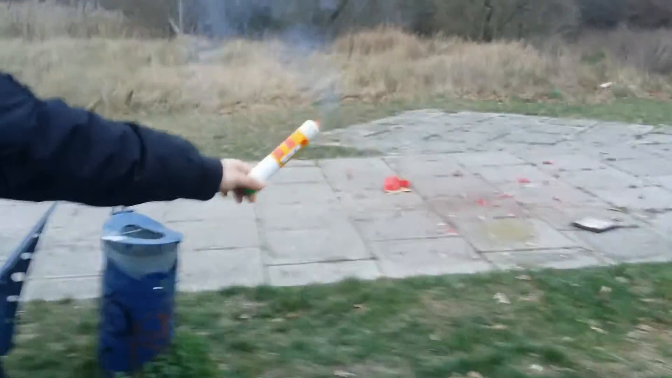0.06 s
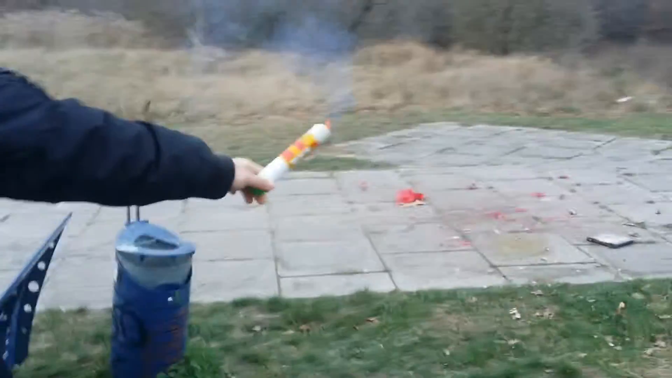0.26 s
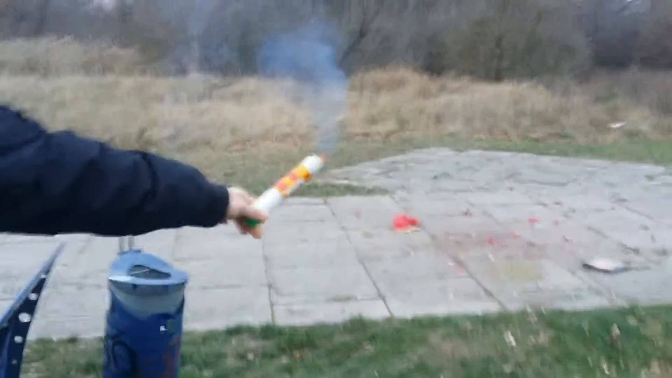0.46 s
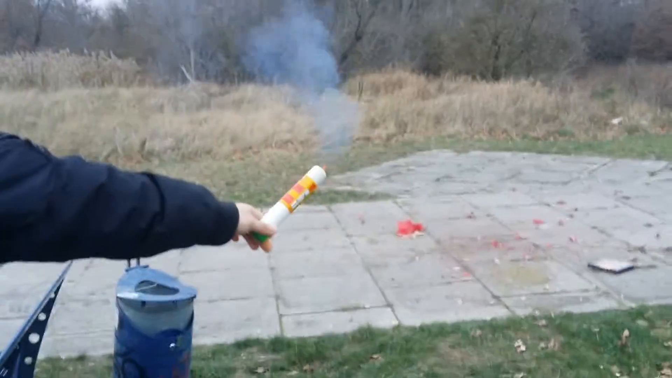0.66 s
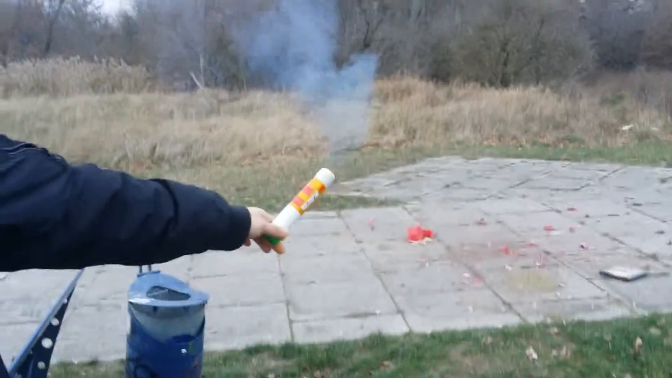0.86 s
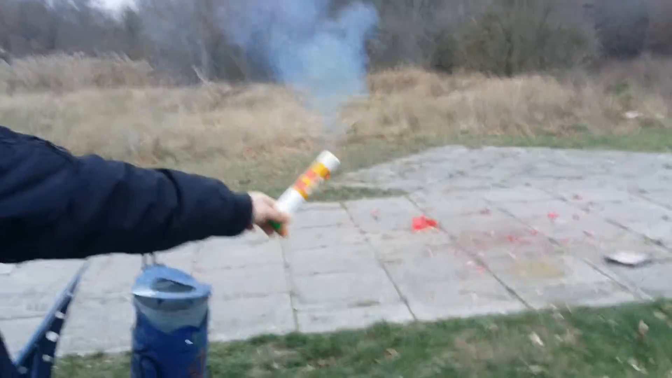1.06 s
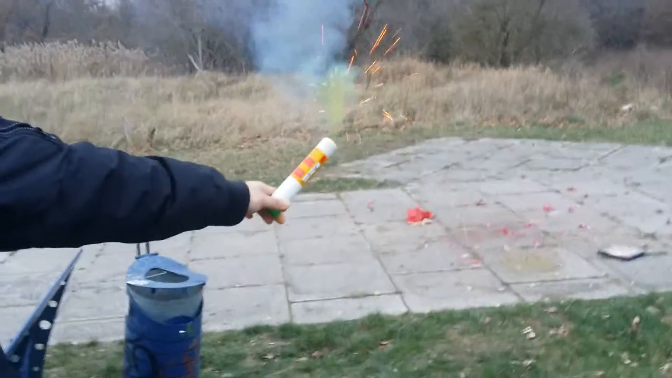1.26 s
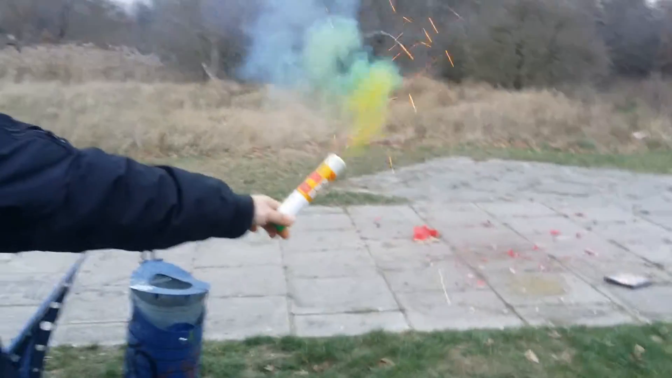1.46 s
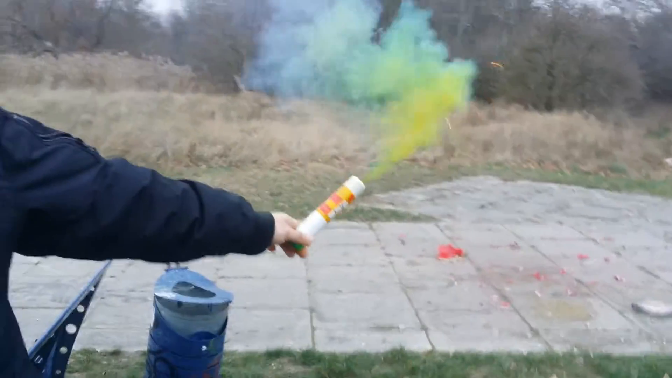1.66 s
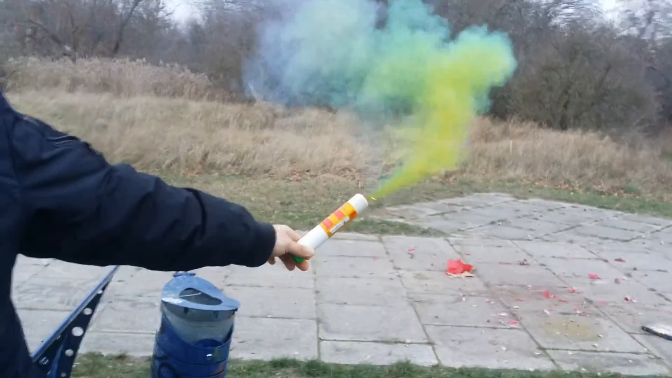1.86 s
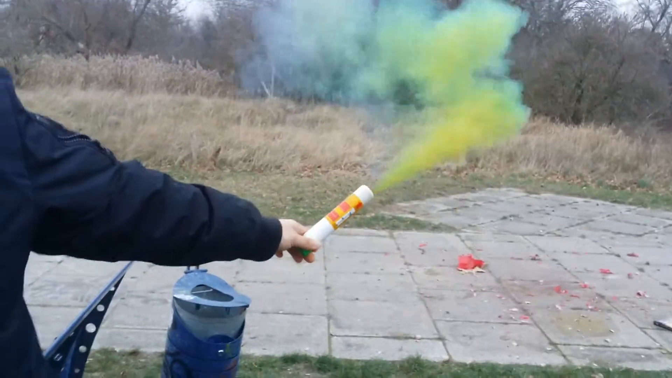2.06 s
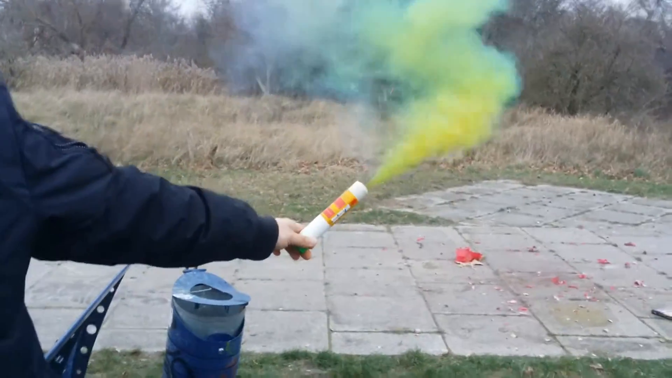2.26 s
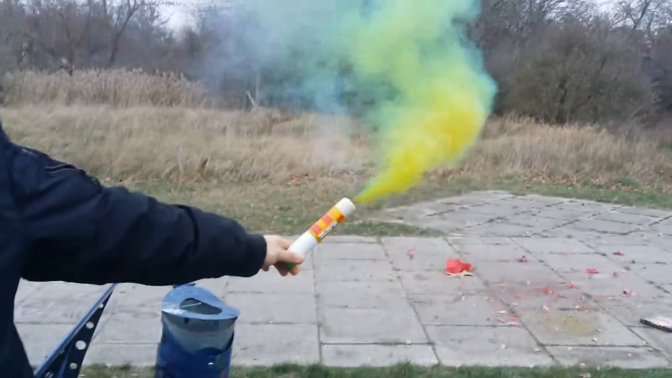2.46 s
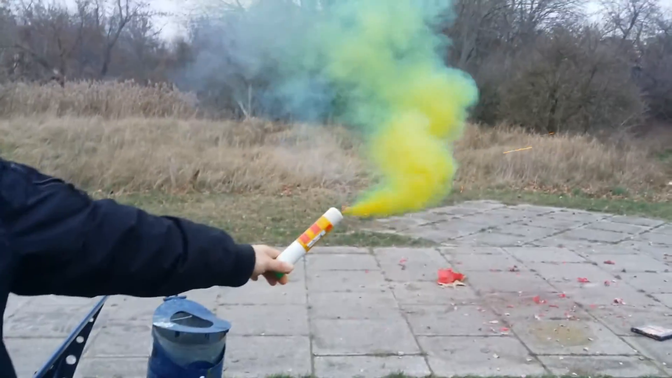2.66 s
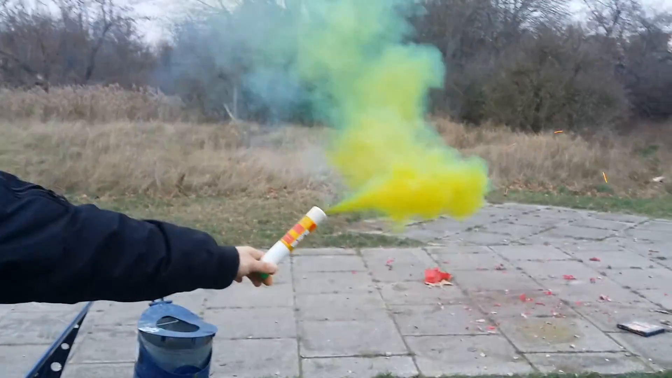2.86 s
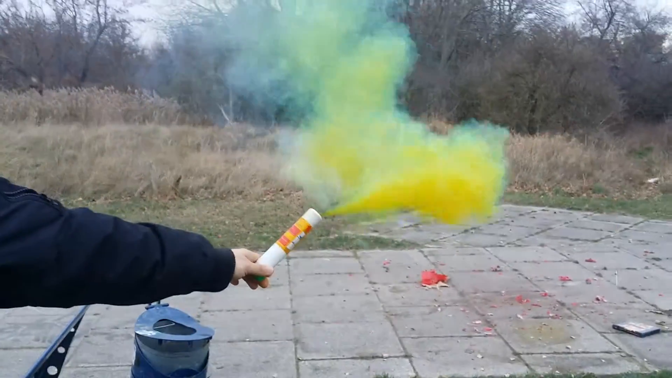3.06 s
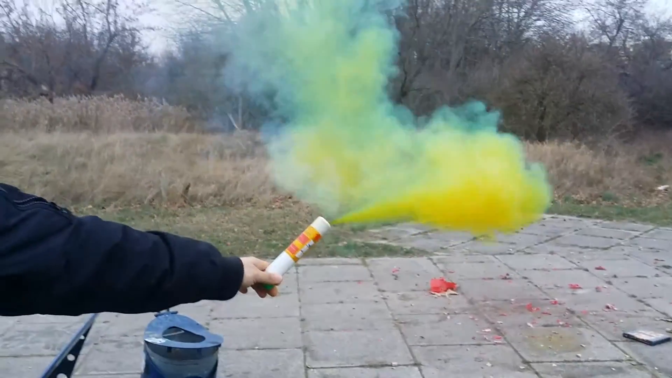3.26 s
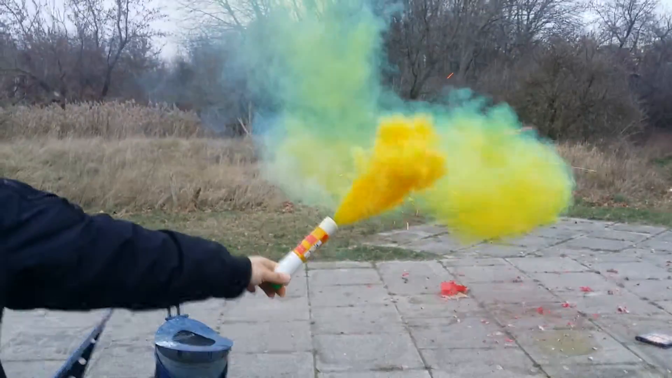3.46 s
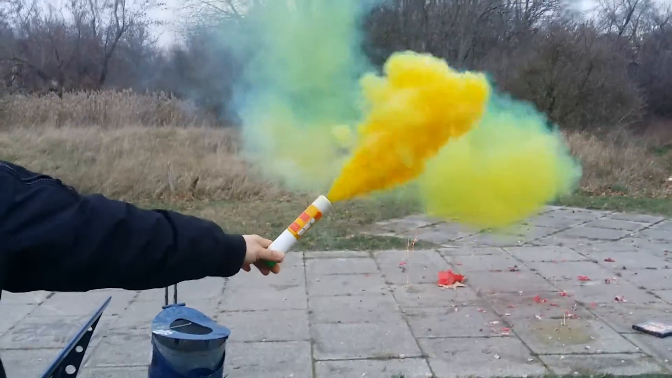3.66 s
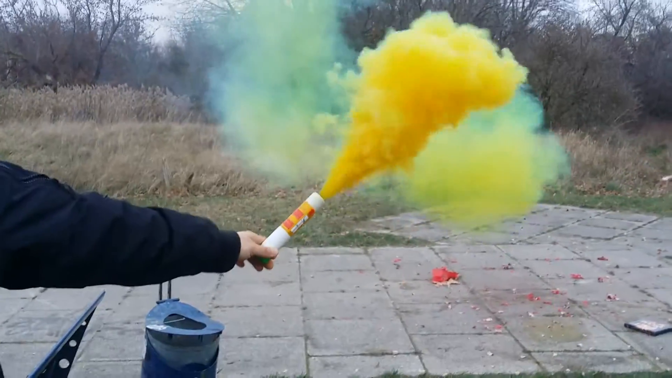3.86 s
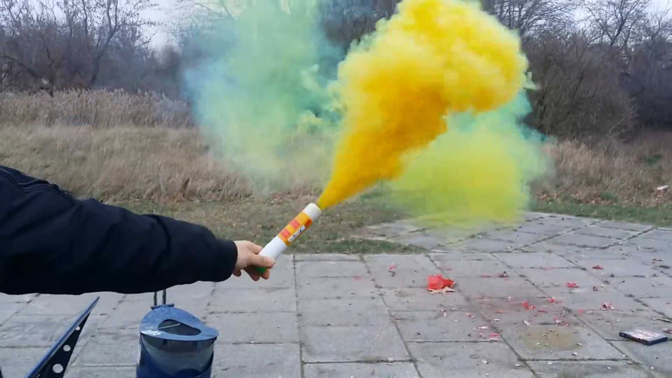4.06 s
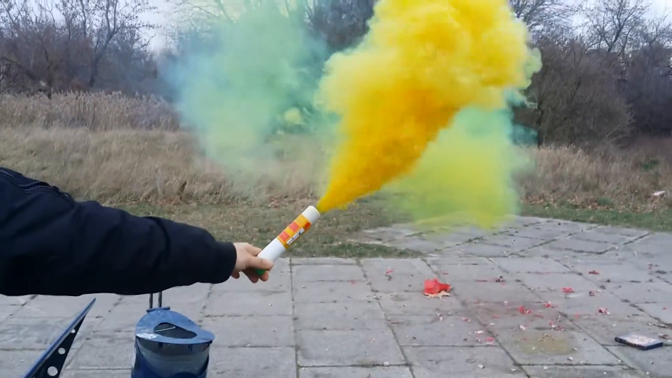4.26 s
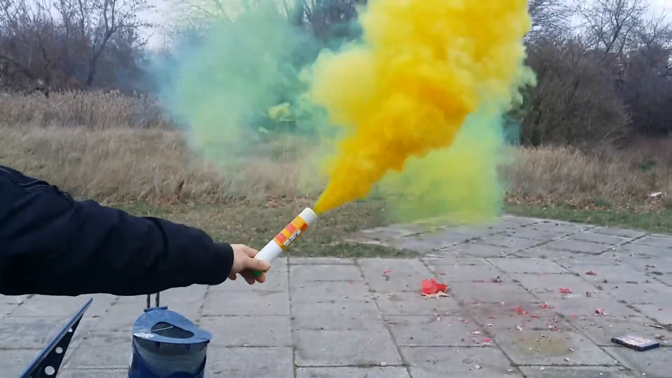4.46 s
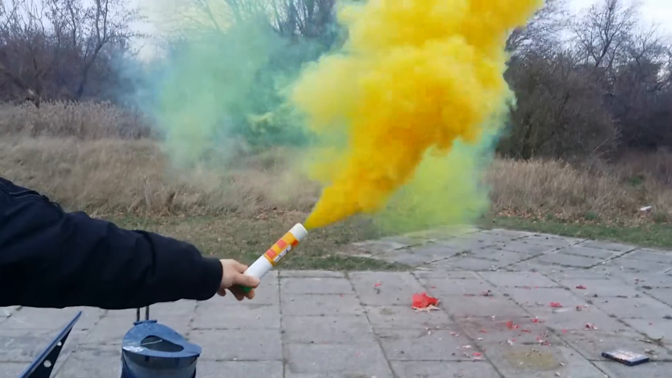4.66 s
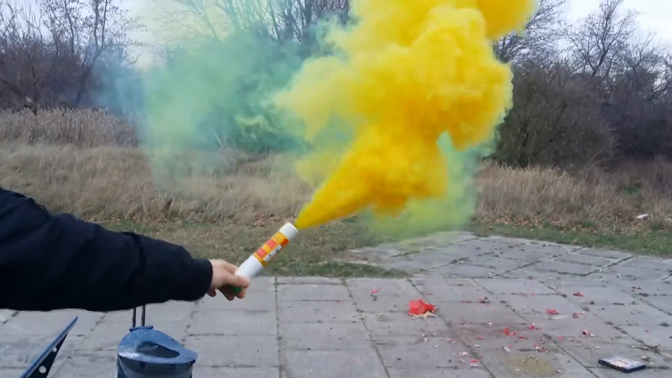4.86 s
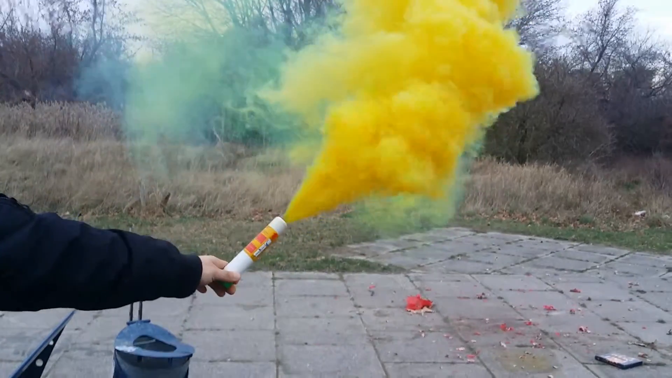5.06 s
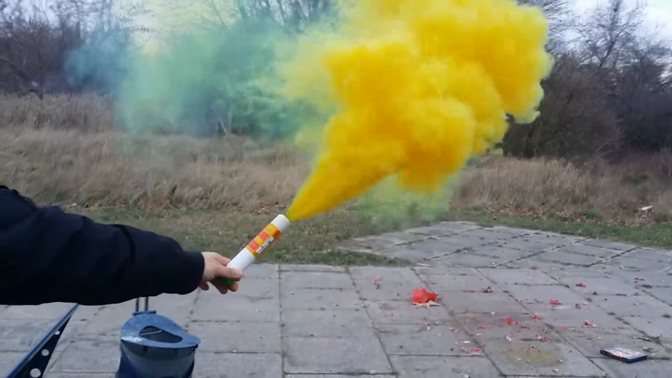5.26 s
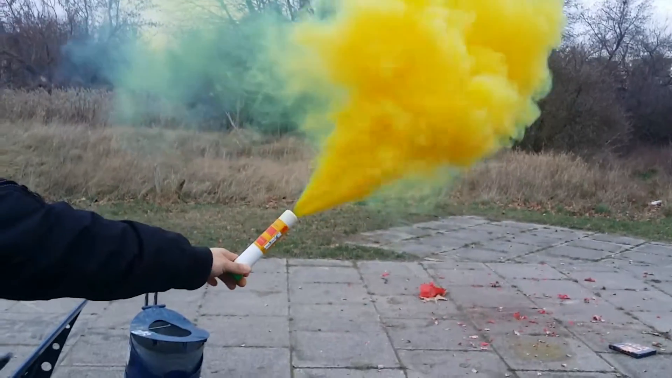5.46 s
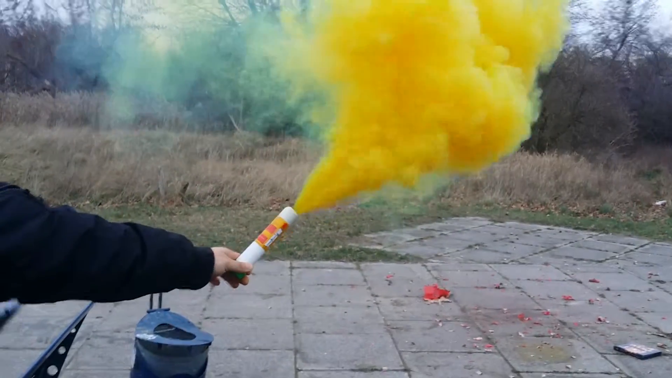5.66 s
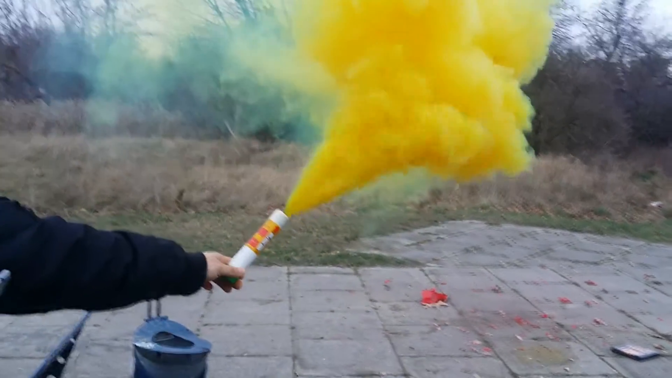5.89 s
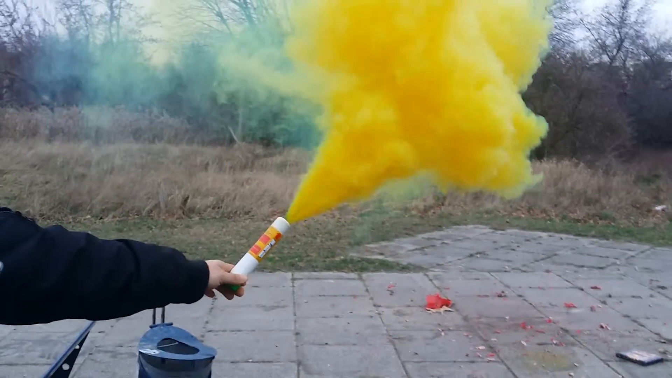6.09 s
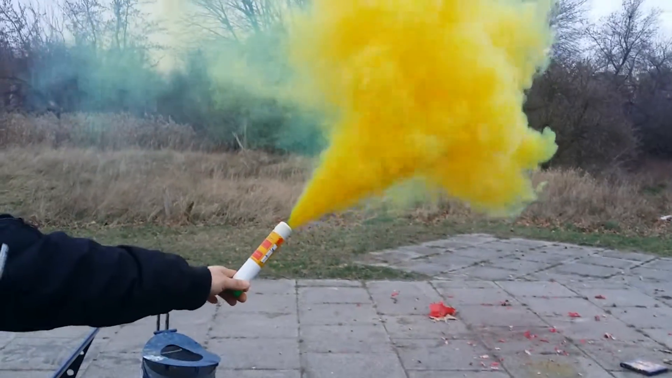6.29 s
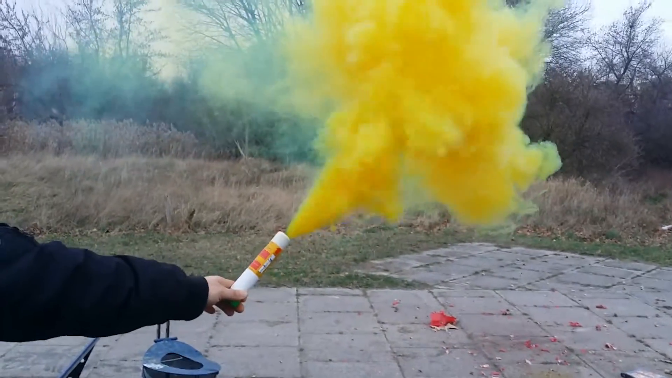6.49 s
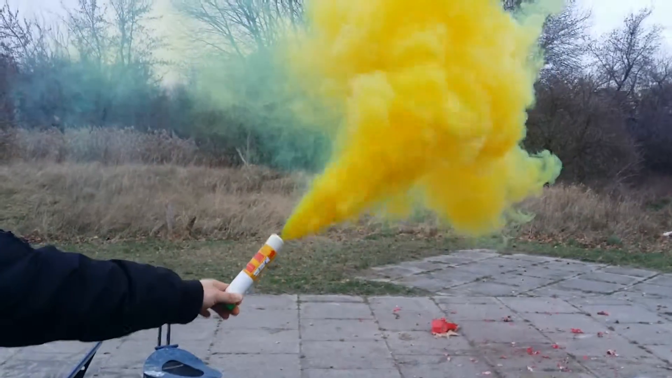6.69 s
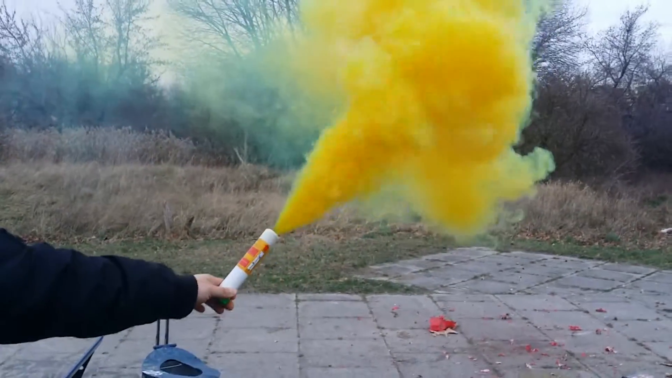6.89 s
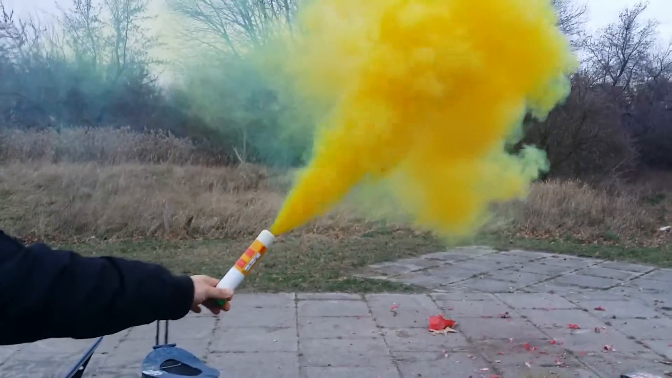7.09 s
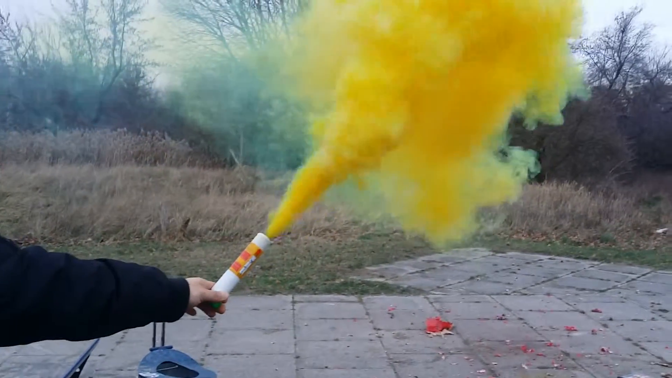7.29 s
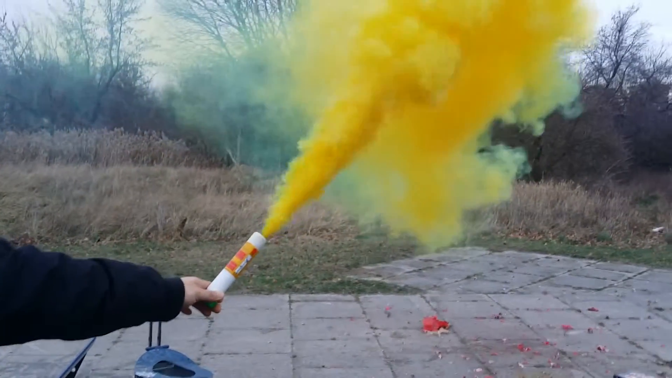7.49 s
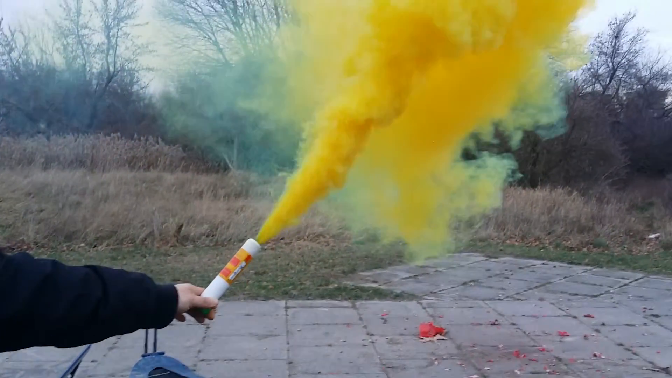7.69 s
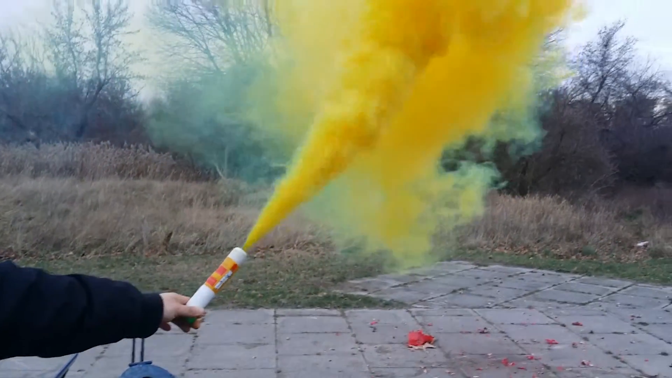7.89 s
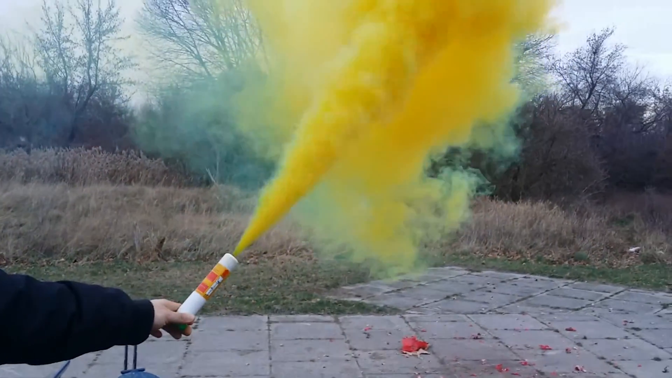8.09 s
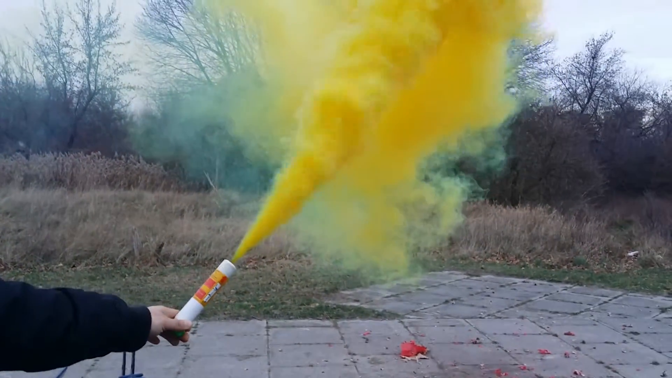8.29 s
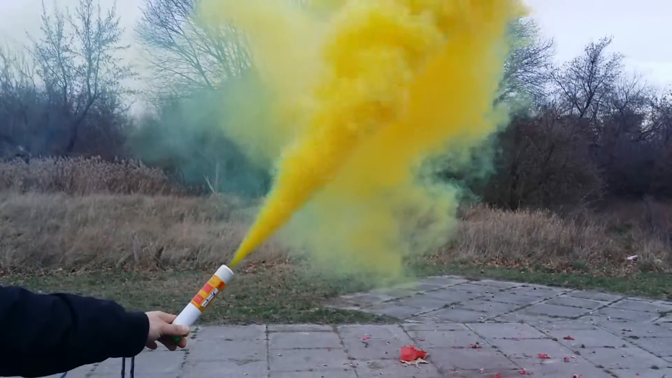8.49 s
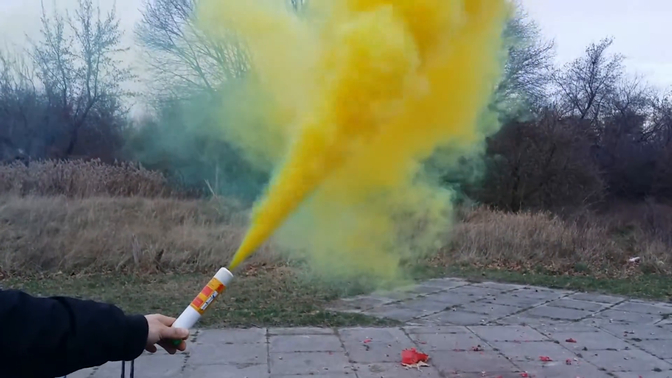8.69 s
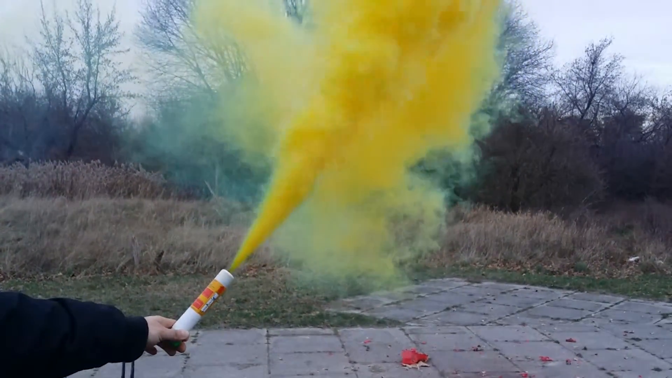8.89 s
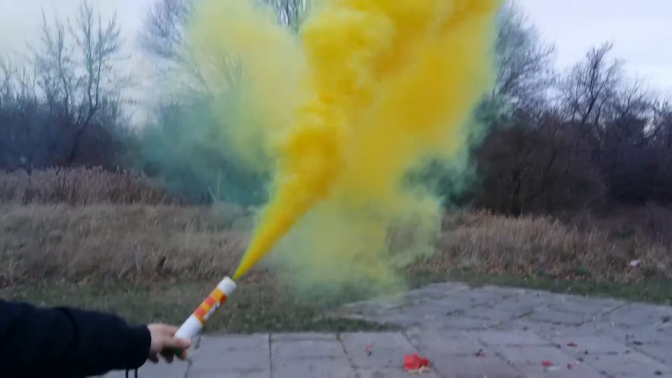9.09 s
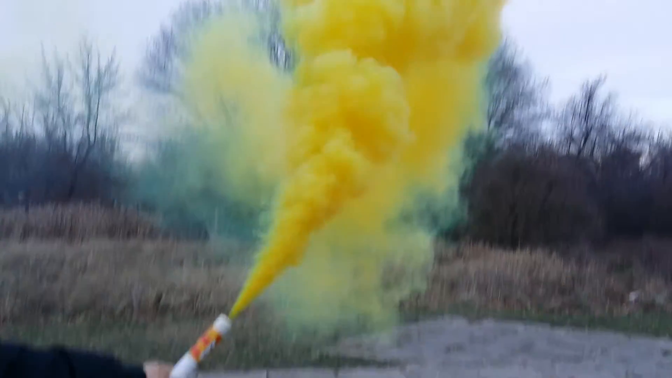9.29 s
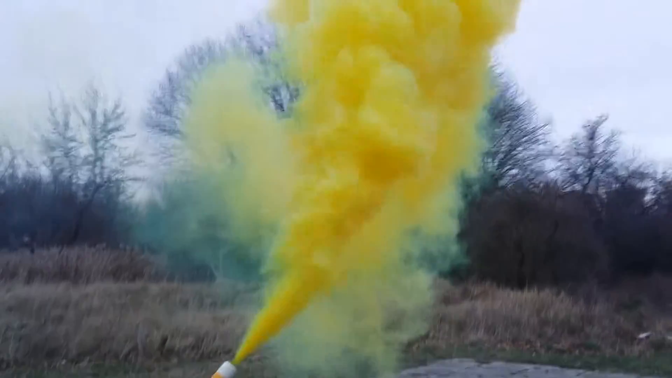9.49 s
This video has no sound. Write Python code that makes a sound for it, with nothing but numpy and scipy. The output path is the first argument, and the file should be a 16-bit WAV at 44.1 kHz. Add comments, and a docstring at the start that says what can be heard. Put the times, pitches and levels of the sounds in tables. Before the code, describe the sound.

A starter charge sizzles up to a steady high hiss, with a few crisp ticks, then cuts out in a woody knock and a puff of gas. The main smoke jet builds gradually, fluttering and surging, spitting sharply several times. Light scuffs and a faint vehicle rumble sit behind. Open yard, nearby microphone, only short reflections from paving.

```python
"""Smoke flare over a paved yard.

A starter catches, builds to a hiss and burns out with a hollow pop; the smoke charge takes over, surging and
spitting slag. Jet, plume, spits and sparks are shaped noise, grains are random impulses, and the tube's rings
are moving spectral peaks. Paving and arm echo the jet and plume; feet scuff in short bumps and filtered rubs.
Behind them distant traffic rumbles as low noise, with two wavering engine tones.
"""
import sys
import numpy as np
from scipy import signal
from scipy.fft import rfft, irfft
from scipy.io import wavfile
from scipy.ndimage import uniform_filter1d, map_coordinates

SR = 44100
rng = np.random.default_rng(int(sys.argv[2]) if len(sys.argv) > 2 else 0)


def materialize(psi):
    """Save the field psi as 16-bit PCM at rate SR to the path in sys.argv[1].

    A 1-D psi becomes a single channel; in a 2-D psi each row is a channel.
    """
    bounded = np.clip(np.atleast_2d(psi).T, -1, 1)
    quanta = np.round(bounded * 32767).astype(np.int16)
    wavfile.write(sys.argv[1], SR, quanta)


N = 420713
TIME = np.arange(N) / SR
TOP_HZ = 15600


def undb(db):
    """Decibels to amplitude gain."""
    return 10 ** (np.asarray(db) / 20)


def curves(table):
    """Each column of a timed table, joined by straight lines."""
    s, *columns = np.transpose(table)
    return [np.interp(TIME, s, column) for column in columns]


def unit(x):
    """Scale to rms 1."""
    return x / np.sqrt(np.mean(x ** 2))


def bell(s, half_s):
    """Gaussian of height 1 around a moment; falls to 1/e at half_s."""
    return np.exp(-((TIME - s) / half_s) ** 2)


def swell(s, rise_s, fall_s):
    """Gaussian of height 1 with different rise and fall times."""
    return bell(s, np.where(TIME < s, rise_s, fall_s))


def walk(rate_hz):
    """Random levels held 1 / rate_hz s and smoothed twice; rms 1."""
    hold = max(int(SR / rate_hz), 1)
    held = np.repeat(rng.standard_normal(N)[:N // hold + 1], hold)
    smooth = uniform_filter1d(uniform_filter1d(held, hold), hold)
    return unit(smooth[:N])


def ports(apart):
    """White noise at two ports; the share `apart` of its power is unrelated between them."""
    apart = np.clip(apart, 0, 1)
    common = rng.standard_normal(N)
    separate = rng.standard_normal((2, N))
    return np.sqrt(1 - apart) * common + np.sqrt(apart) * separate


def colour(x, *spectra):
    """Minimum-phase filter through (Hz, relative dB) points, one spectrum for both ports or one each."""
    size = 4096
    log_hz = np.log(np.maximum(np.fft.rfftfreq(size, 1 / SR), 1))
    gains = []
    for spectrum in spectra:
        point_hz, point_db = np.transpose(spectrum)
        gains.append(undb(np.interp(log_hz, np.log(point_hz), point_db)))
    gain = np.array(gains)
    power = np.mean(gain ** 2 * (log_hz < np.log(TOP_HZ)))  # shared by the ports, keeps their balance
    cepstrum = irfft(np.log(gain / np.sqrt(power)))
    # folding the cepstrum onto positive time makes the filter causal
    response = irfft(np.exp(rfft(2 * cepstrum[:, :size // 2], size) - cepstrum[:, :1]))
    return signal.fftconvolve(np.atleast_2d(x), response, axes=1)[:, :N]


def delay(x, ms):
    """Read a sound late by a moving number of milliseconds."""
    return map_coordinates(x, [np.arange(N) - ms * SR / 1000], order=3, mode="nearest")


def flow():
    """Strength of the jet in dB: the starter catches, falters and burns out, and the smoke charge takes over."""
    # Each row: time in seconds, dip in dB, half length in seconds.
    stalls = [(1.16, -8, 0.058), (3.363, -5, .025)]
    # Each row: time in seconds, hiss level of the smoke charge in dB.
    charge_flow = [(3.2, -35), (3.55, -40), (4.25, -32.5), (5.5, -26.5), (6.7, -23), (7.1, -23.5),
                   (7.4, -27.5), (8.3, -23.5), (9.54, -24.5)]
    smoulder_db, starter_db = -67, -28.5
    catch_s, catch_power = 1.88, 2.34
    burnout_s, fade_s = 3.447, 0.045

    rise = (TIME / catch_s) ** catch_power
    catch = rise / (1 + rise)  # S-curve
    alight = .5 - .5 * np.tanh((TIME - burnout_s) / (2 * fade_s))
    stalls_db = sum(db * bell(s, half_s) for s, db, half_s in stalls)
    starter = (undb(smoulder_db) + undb(starter_db + stalls_db) * catch) * alight
    charge = undb(curves(charge_flow)[0]) * (1 - alight)
    return 20 * np.log10(np.hypot(starter, charge))


def surges():
    """Rise of pressure in dB: uneven chuffs slow down; surges and stronger chuffs swell slowly and drop fast."""
    # Each row: peak time in seconds, rise in dB ahead of the sag.
    swells = [(5.727, 2), (6.39, 3), (6.485, 4.5), (6.625, 6), (6.728, 5), (6.911, 6), (7.01, 7.5),
              (7.227, 7.5), (7.77, 3), (8.125, 1.5), (8.245, 2.5), (8.515, 4.5), (8.65, 2.5), (8.895, 4),
              (9.078, 3), (9.47, 3.5)]
    build_s, collapse_s = 0.05, 0.019
    # the chuffs slow as the tube empties
    chuff_start_s, chuff_hz, chuff_sag_hz_per_s = 4.156, 10.046, .595
    chuff_db, chuff_scatter_db = 0.74, 0.65

    age = np.maximum(TIME - chuff_start_s, 0)
    cycles = chuff_hz * age - chuff_sag_hz_per_s * age ** 2 / 2
    chuffs = chuff_db * np.cos(2 * np.pi * cycles) + chuff_scatter_db * walk(24)
    rise = sum(db * swell(s, build_s, collapse_s) for s, db in swells)
    sag = 0.78 * uniform_filter1d(rise, SR // 4)  # pressure sags between swells
    return (age > 0) * chuffs + rise - sag


def spits():
    """Strength of bursts of hiss and low puff: first a longer breath after the pop, then short spits of slag."""
    # Each row: peak time in seconds, hiss in dB, low puff in dB, 1/e length each side in seconds.
    bursts = [(3.4, -32.5, -64, 0.057), (4.872, -41, -34, 0.0037), (5.092, -28, -31.5, 0.0046),
              (5.57, -22, -31, 0.0032), (5.943, -20.5, -32.5, 0.0065), (6.475, -15.5, -28, 0.0045),
              (6.729, -15, -24.5, 0.0024), (7.006, -19.5, -39, 0.0061), (7.229, -13, -27, 0.006),
              (9.458, -9, -39, 0.0018)]
    hiss, puff = np.zeros((2, N))
    for s, hiss_db, puff_db, length_s in bursts:
        burst = np.exp(-np.abs(TIME - s) / length_s)
        hiss += undb(hiss_db) * burst
        puff += undb(puff_db) * burst
    return hiss, puff


def crackle(rate_hz, spread_db):
    """Impulses of burning grains: many faint, a few strong."""
    size = undb(spread_db * np.minimum(rng.exponential(size=N), 5))
    struck = rng.random(N) < rate_hz / SR
    return unit(struck * size * rng.choice([-1, 1], N))


def nozzle(flow_db, burst):
    """Gas and burning grains rush through the hole; the hiss flutters, and changes colour with the charge."""
    # Hiss spectra at the left and right ports. Each row: frequency in Hz, relative level in dB.
    starter_left, starter_right = [(1000, -35), (2300, -16), (3200, -8.5), (4600, -4.5), (5700, -5),
                                   (6600, 2), (7300, -4.5), (7900, -9.5), (10700, -7), (15200, -12)], [(1000, -20.5), (2300, -18), (3200, -6.5),
                                                         (4600, -8), (5800, -11.5), (6600, -3), (8400, -1),
                                                         (9400, -8.5), (11000, -5.0), (13000, -13.5),
                                                         (15200, -12)]
    charge_left, charge_right = [(1000, -26), (2400, -15.5), (3700, -9.5), (5000, -15), (6000, -1),
                                 (6900, -2.5), (7700, -11.5), (10000, -8.5), (13500, -6.5), (15200, -4.5)], [(1000, -33.5), (2600, -12.5), (3100, -7.5),
                                                      (4000, -8.5), (5000, -12), (6200, -3.5), (7200, -0.5),
                                                      (8200, -0.5), (9500, -15), (11100, -1.5), (13000, -8),
                                                      (15200, -5.5)]
    # Start and end of the change of colour, in seconds.
    handover_s = [3.6, 6.3]

    flutter_db = 0.89 * walk(35) + 0.22 * walk(250)
    strength = np.hypot(undb(flow_db + flutter_db), burst)
    gas = rng.standard_normal(N) + 0.55 * crackle(rate_hz=2500, spread_db=3.0)
    eddies = 0.27 * rng.standard_normal((2, N))  # the wide edge of the jet reaches each port differently
    jet = strength * unit(yard(gas, scatter=0.16, paving=0.22, arm=0.13) + eddies)
    starter = undb(0.27) * colour(jet, starter_left, starter_right)
    charge = undb(0.14) * colour(jet, charge_left, charge_right)
    share = np.interp(TIME, handover_s, [0, 1])
    return (1 - share) * starter + share * charge


def plume(flow_db, surge_db, puff):
    """The billowing smoke roars lower down, swelling with each surge and puffing with each burst."""
    # Spectra of the roar and the puffs. Each row: frequency in Hz, relative level in dB.
    roar_spectrum, puff_spectrum = [(100, -18.5), (300, -4.5), (430, -11.5), (620, -4.5), (780, -2.5),
                                    (1020, -2.5), (1280, 2.5), (1520, -3), (1800, -0.5), (2400, -9),
                                    (3500, -10.5), (8000, -45)], [(100, 5), (300, 2.5), (750, 6), (1300, 0), (2300, -16),
                                                   (4000, -16), (10000, -10.5)]
    roar_db, roar_db_per_flow_db, thin_smoke_db = -31.5, 0.39, -4

    thin = np.interp(TIME, [3.28, 3.36], [1, 0])
    steady_db = roar_db + roar_db_per_flow_db * flow_db + thin_smoke_db * thin
    strength = undb(steady_db + 0.71 * surge_db + 1.45 * walk(45))
    echoed = yard(rng.standard_normal(N), scatter=0.37, paving=0.49, arm=0.29)
    air = unit(echoed + 0.68 * rng.standard_normal((2, N)))
    grit = unit(air + 0.66 * crackle(rate_hz=1100, spread_db=5.0))  # crumbs of slag crackle in the puffs
    return colour(air * strength, roar_spectrum) + colour(grit * puff, puff_spectrum)


def pop():
    """The fire breaks through to the smoke charge: a hollow knock, a noisy tail and a brief ring of the tube."""
    # Each row: frequency in Hz, relative level in dB.
    pop_spectrum = [(100, -12), (400, -2), (1300, 3), (2200, -8), (3200, -16), (10000, -23)]
    pop_s = 3.313
    knock_db, knock_decay_s = -38, 0.0056
    tail_db, tail_decay_s = -45, .04
    ring_hz, ring_db, ring_decay_s = 2320, -43, 0.027

    age = np.maximum(TIME - pop_s, 0)
    knock = undb(knock_db) * np.exp(-age / knock_decay_s)
    tail = undb(tail_db) * np.exp(-age / tail_decay_s)
    ring = undb(ring_db) * np.sin(2 * np.pi * ring_hz * age) * np.exp(-age / ring_decay_s)
    return colour(ports(apart=.3) * (knock + tail) * (age > 0), pop_spectrum) + ring


def sparks():
    """Sharp ticks of decaying noise as the starter throws sparks."""
    # Each row: start in seconds, level in dB ahead of the overall trim.
    ticks = [(.21, -42.5), (0.456, -32.5), (1.199, -32), (1.339, -31), (1.42, -28)]
    # Each row: frequency in Hz, relative level in dB.
    tick_spectrum = [(800, -26), (2500, -3), (3700, -2), (7000, 6), (11000, -7), (15000, -16)]
    decay_s, trim_db = 0.0033, -1.5
    strength = sum(undb(db) * (TIME >= s) * np.exp(-np.abs(TIME - s) / decay_s) for s, db in ticks)
    return colour(ports(apart=0.93) * strength, tick_spectrum) * undb(trim_db)


def glide(track, t, hz):
    """Complex gain of one moving ring or hollow; the phase turns half a cycle across it."""
    half_width = 0.093  # share of the centre frequency
    s, centre_hz, db = np.transpose(track)
    off = (hz / np.interp(t, s, centre_hz) - 1) / half_width
    return (1j * undb(np.interp(t, s, db)) - off) / np.sqrt(1 + off ** 2)


def drift(pair):
    """Tube rings and reflection hollows glide as the flare burns and moves; hollows shift port phases."""
    # Tube: a bright ring swoops as the starter falters, then climbs; a low ring swells in thick smoke.
    # Hollows: near reflections cancel bands at each port, gliding as the hand moves.
    # One list per ring or hollow. Each row: time in seconds, centre in Hz, gain at the centre in dB.
    tube = [
        [(1.0, 5140, 12), (1.2, 5070, 4), (1.5, 6100, 3.5), (2.4, 6360, 3), (3.3, 7500, 3.6), (5.5, 7100, 0.5)],
        [(3.2, 4350, 0.3), (3.5, 4130, 5.5), (6.5, 5200, 8)],
    ]
    left_hollows, right_hollows = [
        [(.9, 2770, 1), (1.25, 2220, -5), (3.3, 2630, -18), (5.2, 2940, -15), (7.5, 3360, -7),
         (9.54, 3270, -16)],
        [(1.5, 5000, -11), (3.3, 6250, -5.7), (5.2, 6570, -10.5), (7.5, 8160, -5), (9.54, 8200, -8)],
        [(0.8, 9600, -9), (2.0, 9100, -3.5), (3.5, 9470, -4), (5.8, 11000, -11), (7.7, 11250, -59),
         (9.54, 11500, -18)],
        [(1.5, 12200, -14), (2.9, 12500, -28), (3.6, 13600, -11.7), (4.4, 13900, -9), (5.6, 14900, -24),
         (7.5, 14900, -29)],
    ], [
        [(.9, 2750, 1), (1.25, 2090, -12), (3.3, 2430, -1.5), (9.54, 2800, -8)],
        [(0.8, 5360, -3), (1.6, 4940, 2.5), (4.0, 5350, 1), (6.3, 5540, -10.5), (9.54, 5730, -19)],
        [(0.8, 9900, -8.5), (3.5, 9680, -0.5), (9.54, 9640, -11)],
        [(1.5, 13000, 3), (4.0, 13700, 1), (6.0, 13060, -19), (9.54, 12700, -19)],
    ]
    # The flare's bearing at first puts one band out of step.
    # Each row: time in seconds, centre in Hz, phase lead of the left port in radians.
    bearing = [(0, 5400, 3.1), (.6, 4000, 3.1), (1, 3900, 2.8), (1.2, 3900, 0)]
    bearing_half_width_hz = 700

    hz, t, bands = signal.stft(pair, SR, nperseg=512)
    hz = hz[:, None]
    rings = np.abs(np.prod([glide(track, t, hz) for track in tube], axis=0))
    left = np.prod([glide(track, t, hz) for track in left_hollows], axis=0)
    right = np.prod([glide(track, t, hz) for track in right_hollows], axis=0)
    s, centre_hz, lead_rad = np.transpose(bearing)
    off = (hz - np.interp(t, s, centre_hz)) / bearing_half_width_hz
    lead = np.interp(t, s, lead_rad) / (1 + off ** 2)
    gains = np.array([left * np.exp(1j * lead), right])
    return signal.istft(bands * rings * gains, SR)[1][:, :N]


def yard(x, scatter, paving, arm):
    """Sound arrives directly, off the arm and off the paving, with a short scattered tail."""
    # The hand drifts.
    # Each row: time in seconds, paving echo in ms, arm echo in ms, lag of the left port in ms.
    paths = [(0, 5.4, 1.6, -.02), (1.2, 5.6, 2, -.01), (2, 5.52, 1.95, .012), (3, 5.5, 1.9, -.017),
             (4.2, 5.44, 1.74, -.03), (6.4, 5.5, 1.67, -.072), (7.4, 5.6, 1.63, -.112),
             (9.54, 5.7, 1.57, -.106)]
    tail_decay_s = 0.0029
    paving_ms, arm_ms, lag_ms = curves(paths)
    x = x + paving * delay(x, paving_ms) + arm * delay(x, arm_ms)
    t = TIME[:SR // 8]
    tail = rng.standard_normal((2, len(t))) * np.exp(-t / tail_decay_s)
    tail /= np.linalg.norm(tail, axis=1, keepdims=True)
    scattered = signal.fftconvolve(x[None], tail)[:, :N]
    return unit(np.array([delay(x, lag_ms), x]) + scatter * scattered)


def scuffs():
    """Shoes and clothing: a dull decaying sine at contact, then band-passed rubbing that dies away."""
    # Each row: start in seconds, level in dB ahead of the overall trim, centre in Hz, rub decay in seconds.
    contacts = [(.228, -37.5, 574, 0.0079), (.245, -46, 680, 0.15), (.283, -38, 620, 0.008),
                (.326, -43.5, 674, 0.012), (0.455, -35.5, 600, 0.01), (.609, -41.5, 605, 0.016),
                (1.469, -46.5, 277, 0.022), (2.121, -46.5, 380, 0.051), (2.253, -40, 408, 0.011),
                (3.831, -45.5, 237, 0.2), (7.278, -36.5, 560, 0.022), (7.302, -30, 316, 0.029),
                (7.323, -44.5, 520, 0.49)]
    trim_db, attack_s, bump_decay_s = 5.5, 0.0006, 0.0035
    out = np.zeros((2, N))
    rub = ports(apart=0.6)
    for s, db, hz, decay_s in contacts:
        age = np.maximum(TIME - s, 0)
        band = signal.butter(2, [hz / 1.65, hz * 1.3], "band", fs=SR, output="sos")
        bump = np.sin(2 * np.pi * hz * age) * np.exp(-age / bump_decay_s)
        drag = unit(signal.sosfilt(band, rub)) * np.exp(-age / decay_s)
        attack = 1 - np.exp(-age / attack_s)
        out += undb(db + trim_db) * attack * (1.4 * bump + 0.65 * drag)
    return out


def traffic():
    """A far rumble, nearly the same at both ports, swells as a vehicle passes; single engines drone and waver."""
    # Each row: frequency in Hz, relative level in dB.
    rumble_spectrum = [(20, -22), (40, -11.5), (60, -1), (90, 0.5), (130, 1.5), (180, -2.5), (260, -11.5),
                       (500, -13.5), (1100, -21), (2000, -35), (5000, -44), (15000, -41)]
    # Each row: peak time in seconds, half length in seconds, pitch in Hz, peak rms level in dB.
    engines = [(0.84, 0.89, 167.7, -53.5), (4.944, 0.44, 124.5, -47)]
    rumble_db, pass_db = -49.5, 4.5
    pass_s, approach_s, depart_s = 8.2, 6.8, 1

    swell_db = rumble_db + pass_db * swell(pass_s, approach_s, depart_s)
    drone = np.zeros(N)
    for s, half_s, hz, db in engines:
        tone = np.sqrt(2) * np.sin(2 * np.pi * hz * TIME + 2.04 * walk(20))
        drone += undb(db) * bell(s, half_s) * tone
    rumble = colour(ports(apart=0.045), rumble_spectrum)
    return rumble * undb(swell_db + 0.69 * walk(2.9)) + drone


def scene():
    """Jet, plume, pop and sparks over the sounds of the yard; plume, scuffs and traffic lean to the right."""
    flow_db, surge_db = flow(), surges()
    burst, puff = spits()
    lean = undb(np.array([[-1.2], [1.2]]))
    jet = nozzle(flow_db + surge_db, burst)
    flare = drift(jet + lean * plume(flow_db, surge_db, puff))
    return flare + pop() + sparks() + lean * (scuffs() + traffic())


def record(dry):
    """Round the highest peaks with tanh, then cut steeply above TOP_HZ."""
    low_pass = signal.ellip(10, .2, 70, TOP_HZ, fs=SR, output="sos")
    return signal.sosfilt(low_pass, np.tanh(dry))


dry = scene()
out = record(dry)
materialize(out)
```